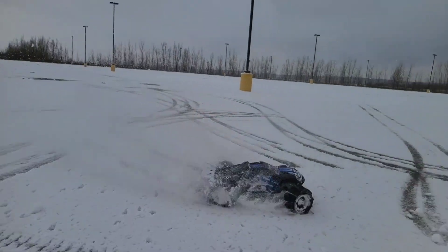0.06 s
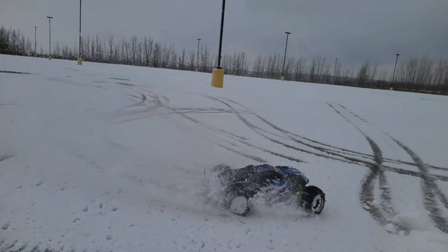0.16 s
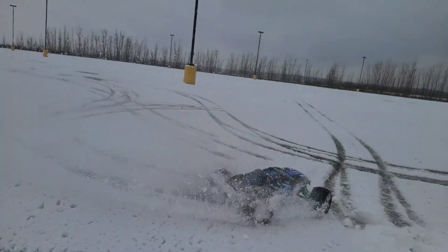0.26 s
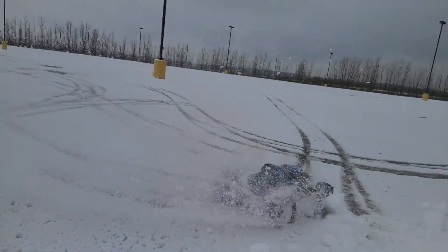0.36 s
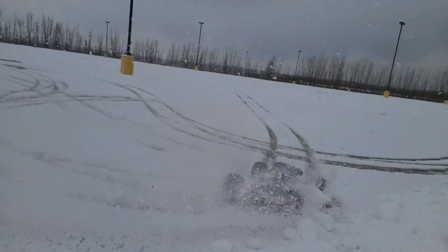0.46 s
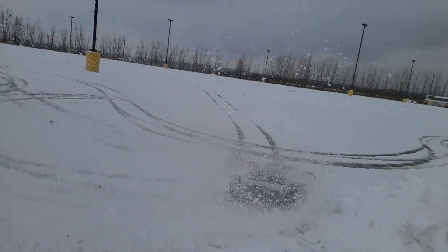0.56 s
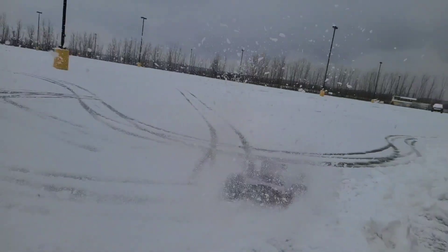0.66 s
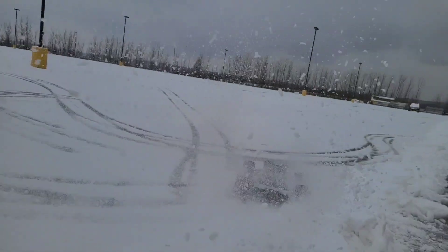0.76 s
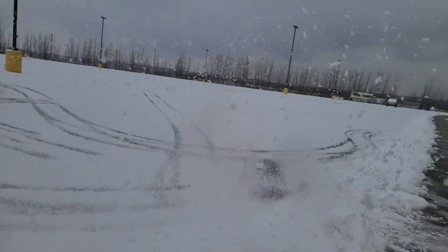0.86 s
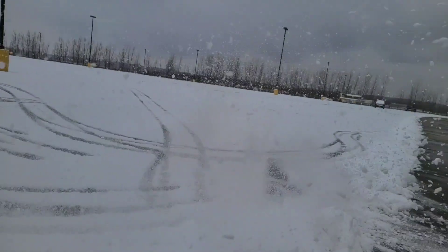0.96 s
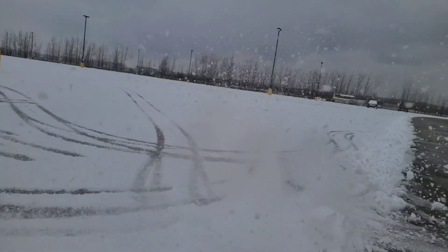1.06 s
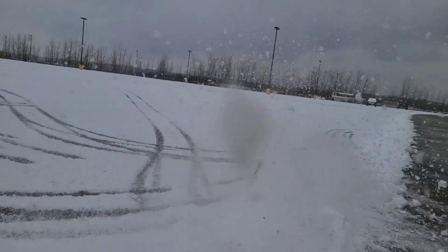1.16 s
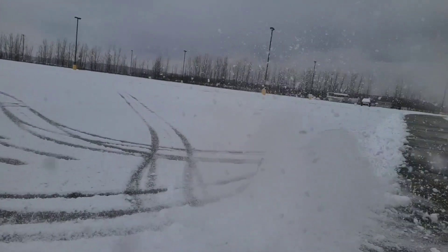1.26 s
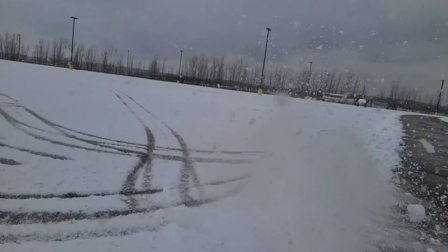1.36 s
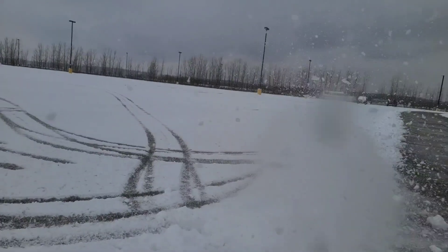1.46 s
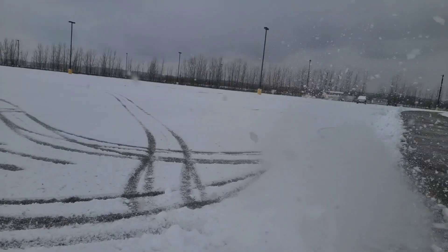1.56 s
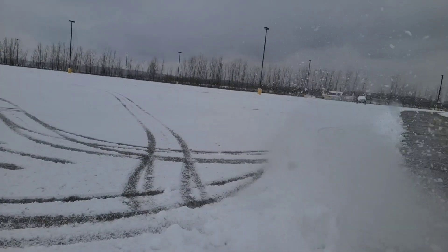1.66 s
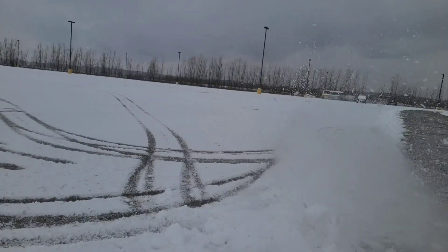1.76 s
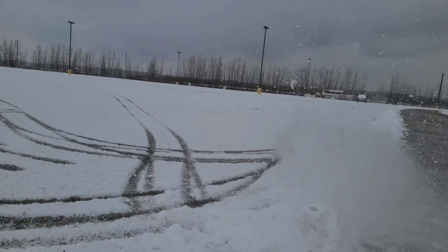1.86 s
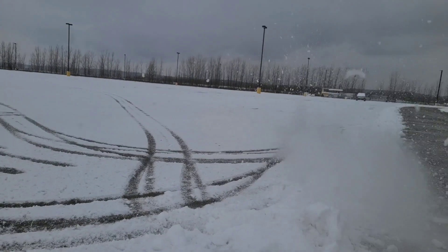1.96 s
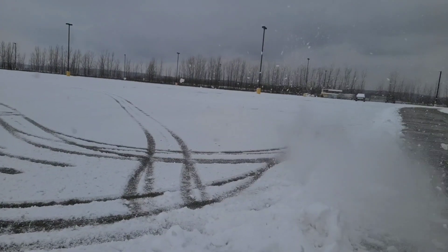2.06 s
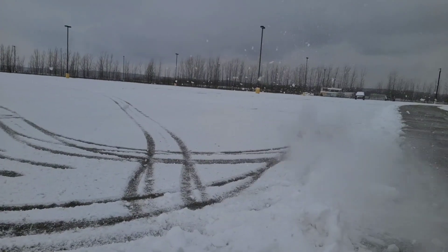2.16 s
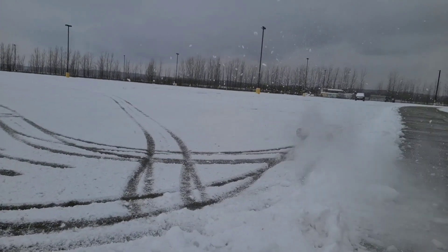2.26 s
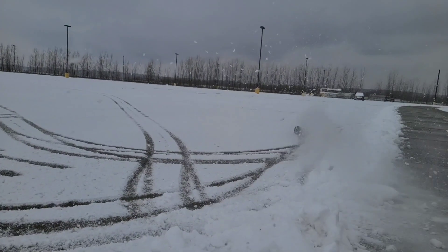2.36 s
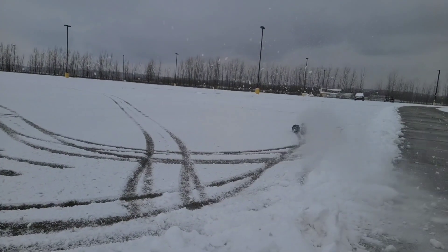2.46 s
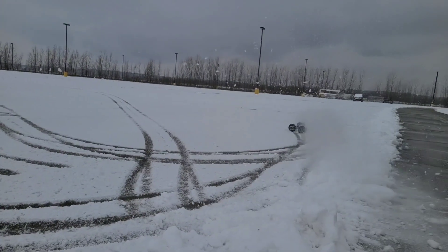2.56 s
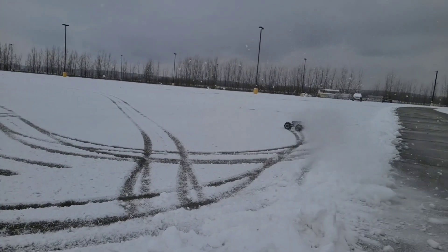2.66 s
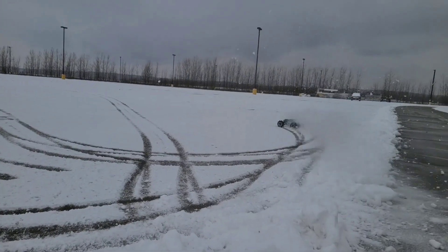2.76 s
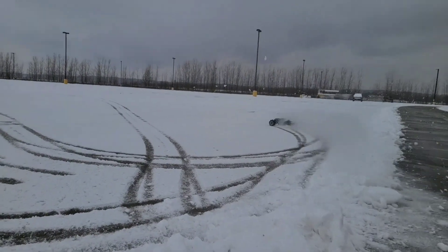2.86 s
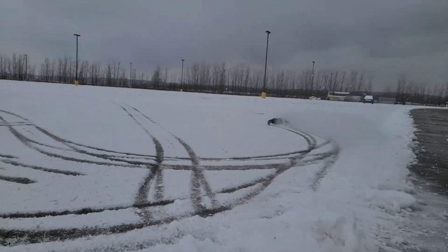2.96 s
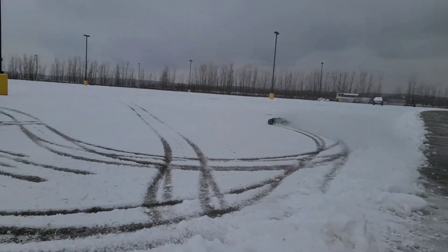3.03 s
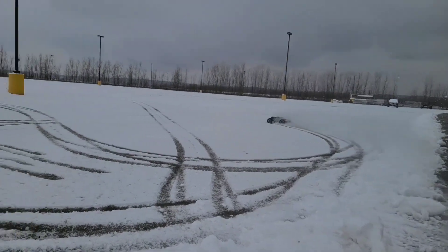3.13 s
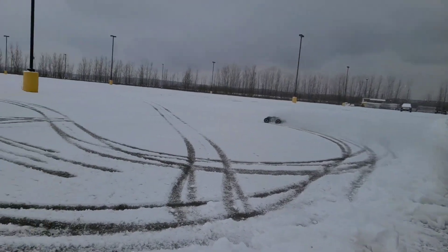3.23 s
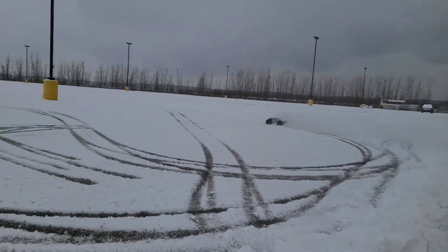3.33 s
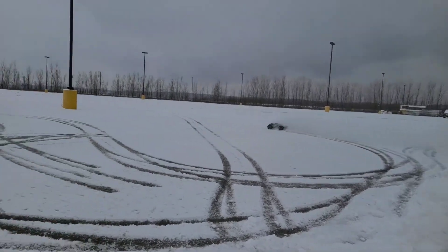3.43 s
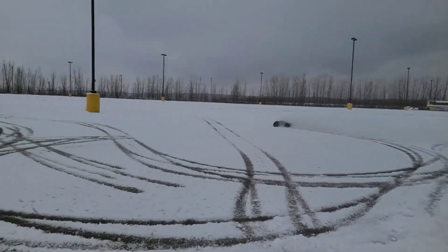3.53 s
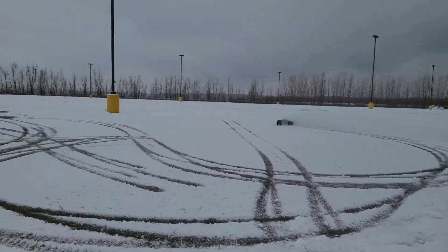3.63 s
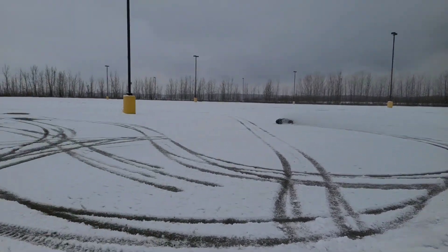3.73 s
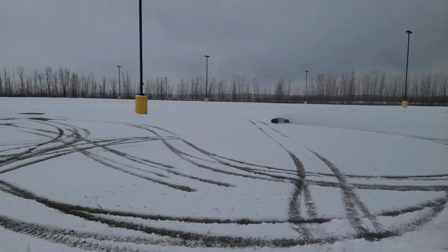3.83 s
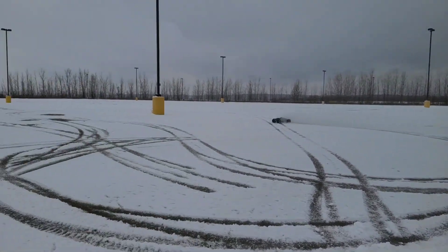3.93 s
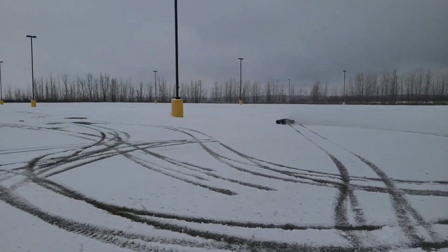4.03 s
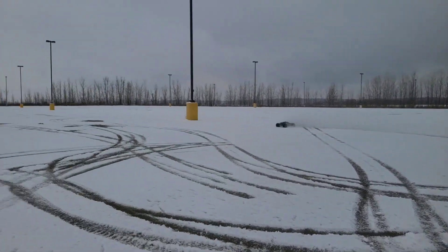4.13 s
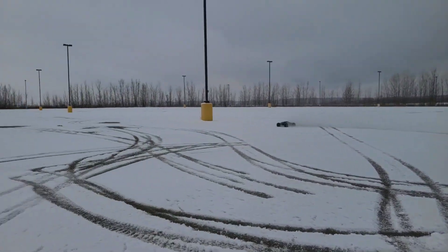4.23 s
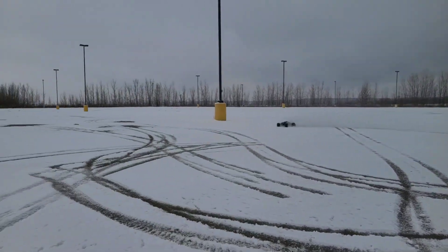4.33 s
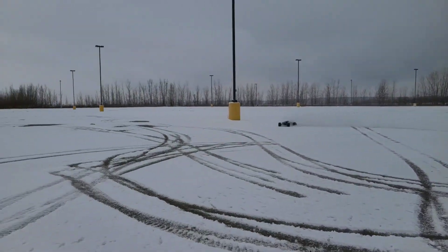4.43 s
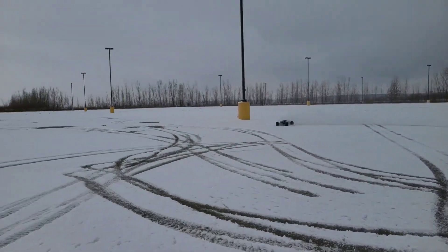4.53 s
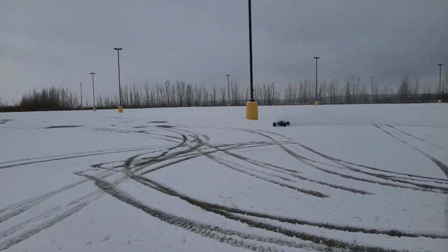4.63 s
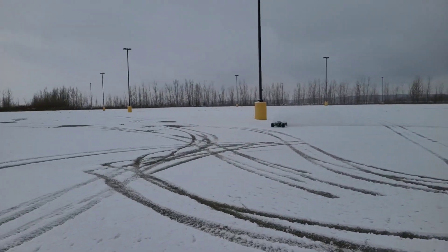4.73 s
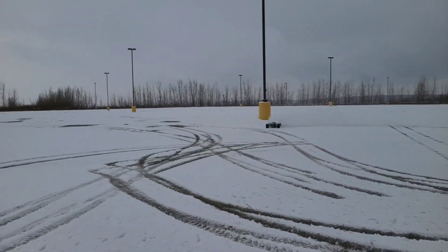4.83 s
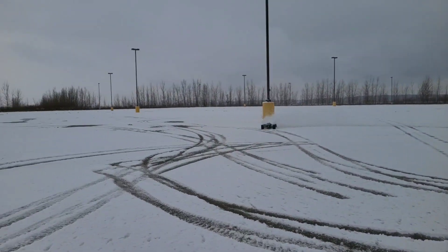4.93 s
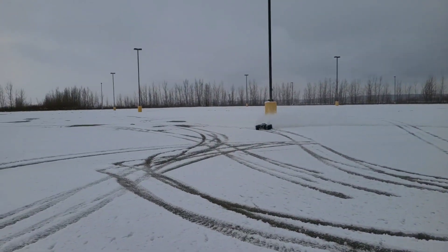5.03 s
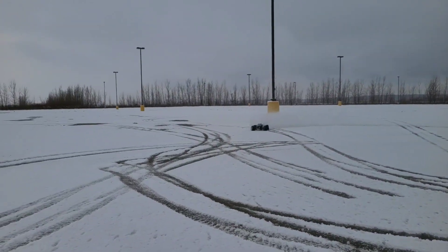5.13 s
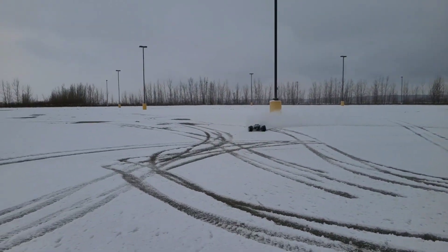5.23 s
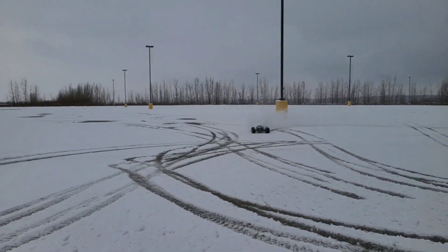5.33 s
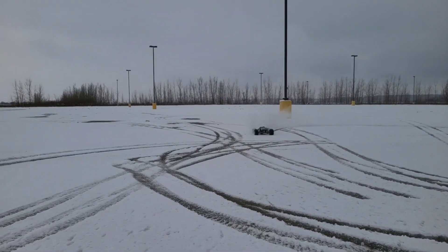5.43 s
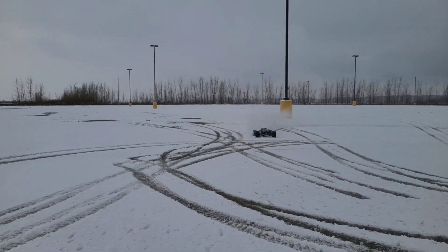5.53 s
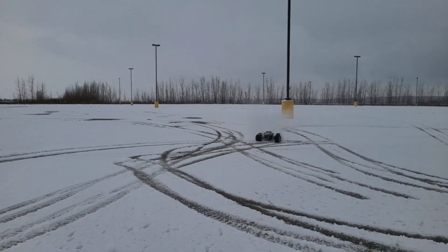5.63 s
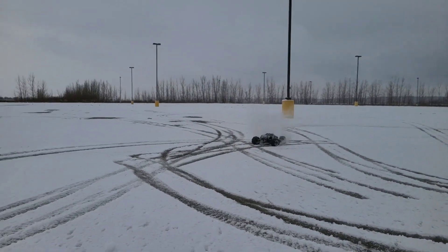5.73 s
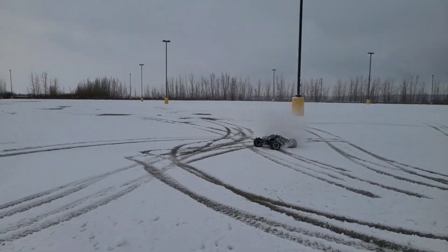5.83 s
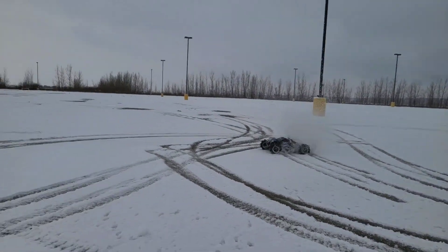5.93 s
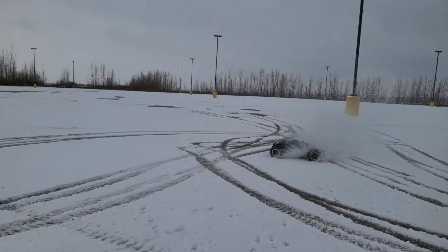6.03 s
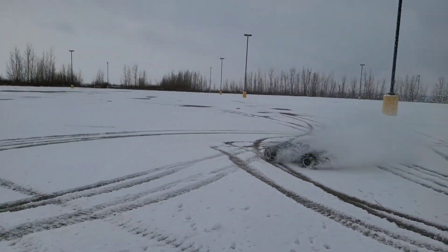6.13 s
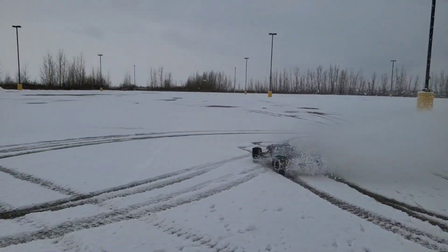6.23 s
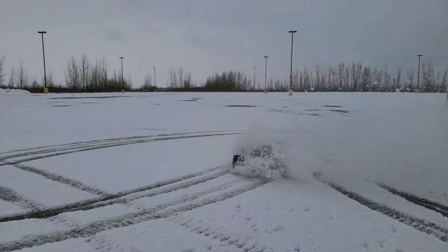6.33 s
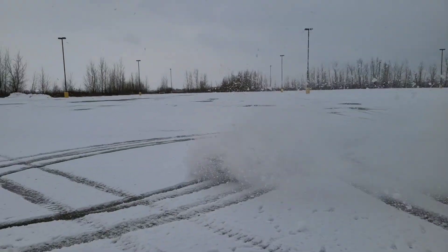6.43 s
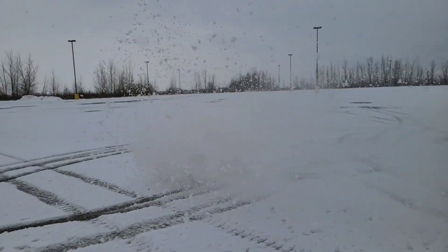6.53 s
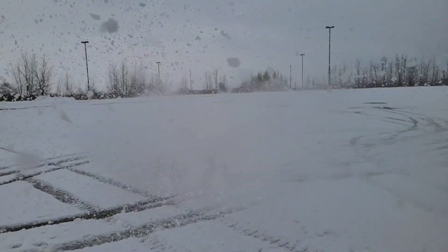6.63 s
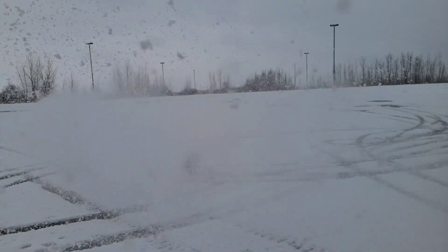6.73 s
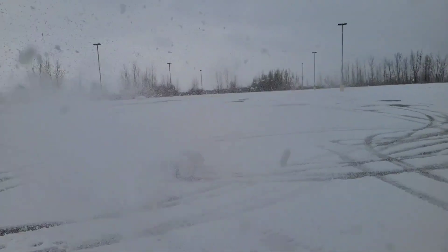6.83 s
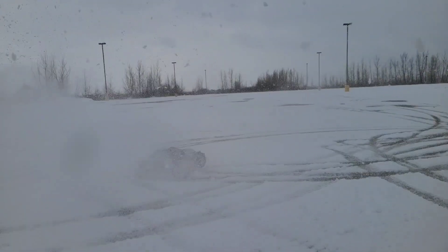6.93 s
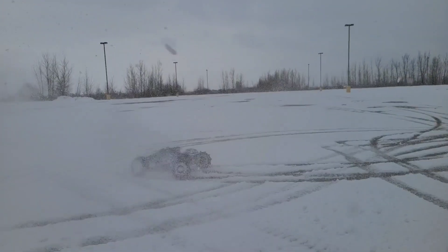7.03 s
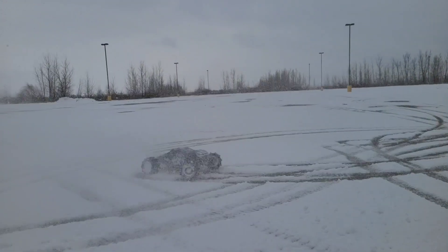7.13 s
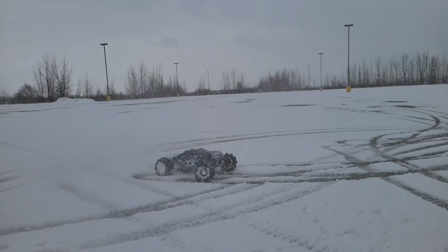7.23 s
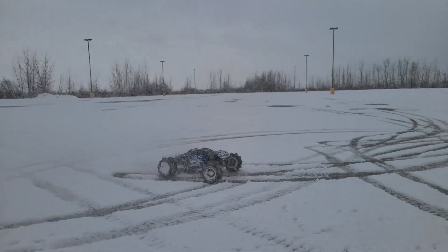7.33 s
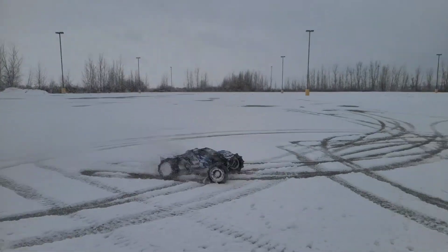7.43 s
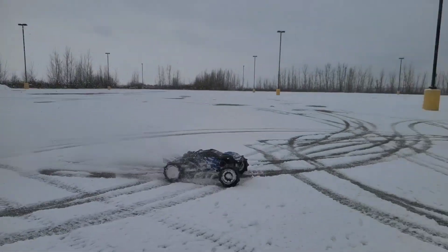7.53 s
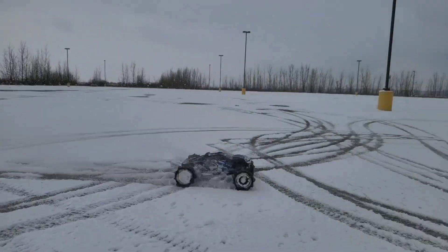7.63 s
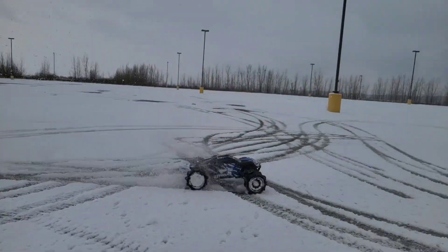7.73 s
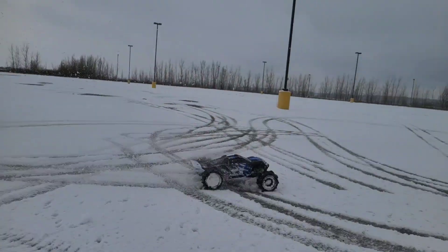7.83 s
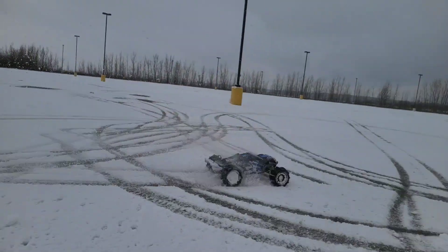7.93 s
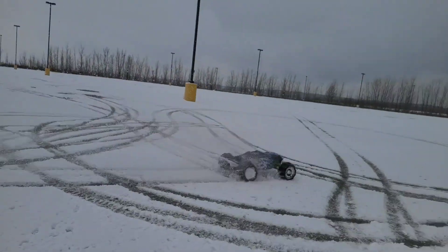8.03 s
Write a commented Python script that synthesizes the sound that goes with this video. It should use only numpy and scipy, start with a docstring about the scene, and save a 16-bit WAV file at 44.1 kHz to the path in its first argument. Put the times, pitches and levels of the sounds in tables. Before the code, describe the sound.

A small electric truck roars and whines through snow, dropping into octave-low slow motion while snow pelts the microphone, then returns at full speed.

```python
"""A small electric truck spins its tyres in snow: lumpy noise roars, shaft orders whine over hiss and a far hum.
At once playback drops to half speed for three seconds: roar, whine and hum sink an octave and the top is cut.
Within it the truck hops, its free low gear sings clean, and thrown snow ticks on the hand-held camera as noise bursts.
The truck drives off; at full speed boots crunch as gritty swells, and it comes back past, pelting the camera again.
Noise is shaped by spectra and random gains, tones by summed phase; the paths to two ports and echoes shape both."""
import sys
import numpy as np
from scipy import signal
from scipy.fft import rfft, irfft, next_fast_len
from scipy.io import wavfile
from scipy.ndimage import uniform_filter1d, map_coordinates

SR = 44100
rng = np.random.default_rng(int(sys.argv[2]) if len(sys.argv) > 2 else 0)


def attenuation_scalar(level_db):
    """Turn a level in dB into a linear amplitude multiplier (20 dB per decade)."""
    decades = np.asarray(level_db, float) / 20
    return 10 ** decades


def file_out(sig):
    """Save sig as 16-bit WAV at sys.argv[1]."""
    # one column per channel
    cols = np.atleast_2d(sig).T
    # limit, then scale
    lim = np.clip(cols, -1, 1)
    pcm = np.round(lim * 32767).astype(np.int16)
    wavfile.write(sys.argv[1], SR, pcm)


N = 356769

# motion and load of the truck: (time [s], nearness [dB], tyres digging in [dB],
# nominal loudest gear tone at full speed [Hz], motor load [dB])
DRIVE = [(0.0, 1, -0.5, 5610, 2), (0.1, -1, -1.5, 5640, 2), (0.36, -0.5, -1.5, 5580, 2),
         (0.64, -1.5, -4, 5460, -6), (1.0, -2.5, -5, 5700, -5.5), (1.25, -3.5, -12.5, 5465, -1.5),
         (1.6, -3.5, -13.5, 5640, -7.5), (2.0, -6.5, -17.5, 5520, -1.5), (2.5, -10, -19, 5500, -2),
         (2.85, -12.5, -19, 5650, -1.5), (3.08, -12, -15.5, 5600, -3), (3.3, -12.5, -18.5, 5440, -5.5),
         (3.8, -12.5, -20.5, 5640, -4.5), (4.2, -11.5, -19.5, 5470, -3), (4.7, -9.5, -16.5, 5550, 1),
         (5.3, -8, -15.5, 5690, -3.5), (5.7, -7, -13, 5650, 3.5), (6.0, -5, -9.5, 5800, 3.5),
         (6.35, -3, -6.5, 5485, 1), (6.55, -1.5, -1, 5520, -1), (6.85, -3, 3.3, 5520, 0),
         (7.0, 2, 4, 5720, 1), (7.2, -3, -0.5, 5560, 6.5), (7.38, 1, -0.5, 5730, -3.5),
         (7.52, -4, -4, 5820, -1), (7.73, 1.5, -3, 5750, 2.5), (7.95, 2.2, -4.5, 5550, 1.5),
         (8.09, 2.5, -5, 5480, 2.5)]
# the hop, tyres off the snow: (start [s], end [s], edge [s])
TYRES_OFF = (.79, .93, .05)


def unit(x):
    """Normalization of signal power: scaled to rms 1."""
    return x / np.sqrt(np.mean(np.abs(x) ** 2) + 1e-20)


def along(points, hz):
    """Logarithmic frequency scale: (frequency [Hz], value) points joined by lines on it."""
    f, v = np.transpose(points)
    return np.interp(np.log(hz + 1), np.log(f + 1), v)


def curves(rows):
    """Linear interpolation in time: one value per sample for each column after the time."""
    s, *columns = np.transpose(rows)
    return [np.interp(np.arange(N) / SR, s, column) for column in columns]


def wobble(rate):
    """Band-limited random modulation: a smooth curve through rate random knots a second."""
    knots = rng.standard_normal(int(N * rate / SR) + 4)
    return map_coordinates(knots, [np.arange(N) * rate / SR])


def filtered(x, response):
    """Linear filtering: the spectrum of x times a complex response of frequency."""
    m = next_fast_len(N + 8192)
    return irfft(rfft(x, m) * response(np.fft.rfftfreq(m, 1 / SR)), m)[..., :N]


def slowed():
    """Time scaling: 1 while playback runs at half speed, 0 elsewhere, with short ramps."""
    start_s, end_s, ramp_s = 0.0655, 3.092, 0.0043
    t = np.arange(N) / SR
    return np.clip(np.minimum(t - start_s, end_s - t) / ramp_s + .5, 0, 1)


def played(make):
    """Frequency scaling with speed: crossfades make(0.498) in the slow stretch with make(1) outside."""
    return slowed() * make(0.498) + (1 - slowed()) * make(1)


def scaled(spectrum):
    """Frequency scaling: every frequency of the spectrum is multiplied by the playback speed."""
    return lambda speed: [(hz * speed, db) for hz, db in spectrum]


def rush(spectrum, patchy_db):
    """Coloured noise: two unrelated noises of rms 1 share time-frequency patches of random gain."""
    z = signal.stft(rng.standard_normal((2, N)), nperseg=512)[2]
    field = uniform_filter1d(rng.standard_normal(z.shape[1:]), 5, 0)
    field = uniform_filter1d(field, 6, 1)
    pair = signal.istft(z * attenuation_scalar(patchy_db * unit(field)), nperseg=512)[1][:, :N]

    def coloured(speed):
        points = [(10, -120)] + spectrum(speed) + [(SR / 2, -120)]
        return unit(filtered(pair, lambda hz: attenuation_scalar(along(points, hz))))

    return played(coloured)


def swells(rows):
    """Gaussian level modulation: rises or dips in dB from (time [s], peak [dB], half length [s]) rows."""
    t = np.arange(N) / SR
    return sum(db * np.exp(-((t - s) / half) ** 2) for s, db, half in rows)


def lull(span):
    """Gating by a trapezoid: 1 inside the (start, end, edge) span in seconds, else 0."""
    start, end, edge = span
    t = np.arange(N) / SR
    return np.clip(np.minimum(t - start, end - t) / edge + .5, 0, 1)


def level(law):
    """Source strength as a linear law: a layer's dB from nearness, digging, load and playback speed."""
    # the tyres bite suddenly: (time [s], extra digging [dB], half length [s])
    bites = [(0.72, 11, 0.036), (0.974, 10, .03)]
    near_db, dig_db, _, load_db = curves(DRIVE)
    dig_db = dig_db + swells(bites)
    base_db, per_near, per_dig, per_load, slow_db = law
    return base_db + per_near * near_db + per_dig * dig_db + per_load * load_db + slow_db * slowed()


def whine(lines, db, turn, width_hz, throb_db, drift_db):
    """Narrow-band modulation: (phase, dB, place in turn) lines are smeared by slow noise and throb each turn."""
    draw = rng.standard_normal((2, 2, N))
    # width_hz holds at full speed and narrows with it
    smear = played(lambda speed: unit(filtered(draw, lambda hz: 1 / (1 + (hz / (width_hz * speed)) ** 2))))
    tone = np.zeros((2, N))
    for phase, line_db, shift in lines:
        swell = attenuation_scalar(line_db + throb_db * np.cos(turn + shift) + drift_db * wobble(6))
        tone += swell * (smear[0] * np.cos(phase) + smear[1] * np.sin(phase))
    return attenuation_scalar(db) * tone


def roar():
    """Impact and structure-borne noise: lugged tyres beat the snow in lumps and shake the chassis."""
    # spectra at full speed, chassis and its octave, tyre lugs, churned snow and its top:
    # (frequency [Hz], relative level [dB])
    thrum_spectrum, octave_spectrum = [(40, -39), (100, -19), (160, -6), (205, 2), (250, -5), (320, -20.5)], [(280, -16), (340, -6), (400, -2.5), (460, -6.5),
                                                      (540, -29.5)]
    growl_spectrum = [(250, -10), (300, -4.5), (480, -2.5), (560, 1), (660, -3), (760, -13), (1000, -26)]
    churn_spectrum, churn_top_spectrum = [(560, -40), (750, -3.5), (1000, -2.5), (1250, -2.5), (1500, -9),
                                          (1900, -15)], [(1150, -16), (1450, -1), (1850, 2.5), (2250, -3),
                                                         (2580, -4.5), (3000, -6), (3420, -7),
                                                         (4250, -12.5), (6400, -15), (9100, -28.5)]
    # how these layers follow the drive: (base level [dB], per nearness [dB/dB], per digging [dB/dB],
    # per load [dB/dB], shift at half speed [dB])
    thrum_law, octave_law = (-24.5, 0.84, 0.05, -0.05, 4.5), (-24.5, 1.14, 0.0557, -0.17, 1.5)
    growl_law = (-25.5, 0.05, 0.8, 0, -3)
    churn_law, churn_top_law = (-32, 0.16, 0.92, -0.06, 1), (-35.5, 0.16, 1.05, -0.03, 1.5)
    # the hop, chassis quiet: (start [s], end [s], edge [s])
    chassis_off = (.828, .9, .02)
    # churn alone swells or dips near 1 kHz: (time [s], change [dB], half length [s])
    churn_swells = [(.3, -3, .25), (3.2, 4, .2), (6.3, 1.5, .2), (7.4, -2.5, .08)]
    # churn and its top swell broadly: (time [s], rise [dB], half length [s])
    body_swells = [(1.3, 3, .3), (2.1, 5, .7), (4.2, 2.5, .5), (5.5, 1.5, .5), (6.7, 1.5, .2)]
    # the chassis thumps over ruts: (time [s], rise [dB], half length [s])
    jolts = [(1.7, 4, .04), (2.31, 4, .04), (2.93, 4, .03), (3.035, 7, .035), (7.02, 3, .05)]
    tyres_off, lumps = lull(TYRES_OFF), wobble(22)

    thrum_db = level(thrum_law) + 1.33 * lumps
    octave_db = level(octave_law) + 1.54 * lumps + 0.83 * wobble(30)
    chassis = attenuation_scalar(thrum_db) * rush(scaled(thrum_spectrum), patchy_db=-1.05)
    chassis += attenuation_scalar(octave_db) * rush(scaled(octave_spectrum), patchy_db=0.53)
    chassis *= attenuation_scalar(-18 * lull(chassis_off) + swells(jolts))

    growl_db = level(growl_law) - 17 * tyres_off + 1.1 * lumps + 1.05 * wobble(40)
    growl = attenuation_scalar(growl_db) * rush(scaled(growl_spectrum), patchy_db=0.05)

    churn_db = level(churn_law) - 17 * tyres_off + swells(churn_swells) + swells(body_swells)
    churn_db += 0.48 * lumps + 1.1 * wobble(60) + 1.6 * wobble(250)
    churn = attenuation_scalar(churn_db) * rush(scaled(churn_spectrum), patchy_db=1.6)

    top_db = level(churn_top_law) + swells(body_swells) - 10 * tyres_off
    top_db += 1.74 * wobble(60) + 2.3 * wobble(400)
    churn_top = attenuation_scalar(top_db) * rush(scaled(churn_top_spectrum), patchy_db=1.6)
    return chassis + growl + churn + churn_top


def gears():
    """Gear-mesh orders: tones at multiples of the shaft rate take turns each gear turn, over spray hiss."""
    # the gearbox: (time [s], nominal shaft rate at full speed [turns/s], nominal pitch swing [share],
    # middle gear level change [dB], low gear level change [dB])
    mesh = [(0, 444, .075, 2.5, 3), (.4, 442, .075, 2.5, 3), (.7, 440, .02, -1, -3),
            (1.2, 446, .03, -1, 1.5), (1.8, 444, .035, -4, 1.5), (2.3, 441, .05, -6, 1.5),
            (3.08, 441, .05, -8, -1.5), (3.4, 440, .006, -4, -4), (3.9, 442, .005, -5, -4),
            (4.3, 448, .004, -3, -3), (4.75, 448, .005, -2, -2), (5.0, 450, .004, 2, -2),
            (5.4, 450, .005, 2, -2), (5.6, 465, .006, -1, -2), (5.8, 470, .008, 1, 0),
            (6.0, 480, .006, 1, 1), (6.3, 464, .005, 1, 0), (6.7, 446, .005, 3, 0), (7.1, 452, .005, -1, 0),
            (7.6, 456, .004, 1, 0), (7.85, 432, .004, -.5, 0), (8.09, 428, .005, -2, 0)]
    # how these layers follow the drive: (base level [dB], per nearness [dB/dB], per digging [dB/dB],
    # per load [dB/dB], shift at half speed [dB])
    top_law, double_law = (-42.5, .7, 0.05, 0.98, 1.2), (-52.5, 0.7, 0.2, 0, -1.5)
    low_law, middle_law = (-43.5, 0.2, .5, .5, 5), (-46.5, 0.15, 0.5, 0.24, 1)
    spray_law = (-38.5, 0.83, 0.19, 0, 2.2)
    # sprayed snow at full speed, then as heard at half speed: (frequency [Hz], relative level [dB])
    spray_spectrum, spray_slow_spectrum = [(1500, -28), (2600, -21), (3600, -8), (4400, -3), (5600, -3),
                                           (7000, -5.5), (8200, -11), (9800, -8.5), (11600, -4),
                                           (13500, -6.5), (16000, -8)], [(450, -4), (900, 2.5), (1300, -4), (1760, -1.5),
                                                          (2300, -.5), (3000, -4), (3210, -5.5),
                                                          (3700, -5.5), (4200, -10), (5170, -8.5),
                                                          (7050, -6), (9280, -4), (11000, -10),
                                                          (11800, -19), (15300, -52), (22000, -120)]
    low_ratio, middle_ratio = 4.3, 8.15  # tooth rates of the other gears over the shaft rate
    free_rev, free_edge_s = .07, .09  # unloaded wheels speed up by this share, then settle

    shaft_hz, swing, middle_db, low_db = curves(mesh)
    free = lull((TYRES_OFF[0], TYRES_OFF[1] + free_edge_s, free_edge_s))
    speed = 1 - slowed() / 2
    # the order that sounds loudest
    lead = curves(DRIVE)[2] / shaft_hz + .4 * free + .35 * wobble(11) * (1 - free)
    turn = 2 * np.pi * np.cumsum(speed * (36.5 + 4 * wobble(7))) / SR
    bend = swing * attenuation_scalar(2.2 * wobble(4.5)) * np.sin(turn)  # once a gear turn
    bend += .3 * swing * wobble(45) + .005 * wobble(6)
    warble = 1 + bend * (1 - free)
    shaft = 2 * np.pi * np.cumsum(shaft_hz * speed * (1 + free_rev * free) * warble) / SR

    # at half speed, outside the hop, a swooping pair stands over the shaft orders;
    # its upper tone follows the middle gear
    swooping = slowed() * (1 - free)
    top = [(k * shaft, -6 * swooping - 7.5 * np.abs(k - lead) ** 1.3, 2.4 * k) for k in (11, 12, 13, 14)]
    top_throb_db = (4.5 + 1.5 * wobble(8)) * (1 - free)
    tones = whine(top, level(top_law) + .6, turn, width_hz=80, throb_db=top_throb_db, drift_db=1.6)
    swoop = [(12.6 * shaft, -1.2, .4), (16.4 * shaft, -6 + middle_db, 1.6)]
    tones += swooping * whine(swoop, level(top_law), turn, width_hz=95, throb_db=2.5, drift_db=1.5)

    double = [(k * shaft, -1.5 * np.abs(k - 2 * lead - 1), 2.4 * k) for k in (25, 26, 27, 28)]
    tones += whine(double, level(double_law) - .6, turn, width_hz=300, throb_db=3.5, drift_db=4)
    low = [(low_ratio * shaft, -3 * free, 2.2), ((low_ratio - .55) * shaft, -3 - 8 * free, .6)]
    tones += whine(low, level(low_law) + low_db, turn, width_hz=80, throb_db=4.5, drift_db=3)
    middle = [(middle_ratio * shaft, 0, 2.7), ((middle_ratio - .6) * shaft, -5, .7)]
    middle_db = level(middle_law) + middle_db - 2.5 - 6 * free
    tones += whine(middle, middle_db, turn, width_hz=110, throb_db=5, drift_db=3)

    spray = rush(lambda rate: spray_spectrum if rate == 1 else spray_slow_spectrum, patchy_db=1.7)
    spray_db = level(spray_law) - 1.5 * lull(TYRES_OFF) + 1.27 * wobble(30) + 1.0 * np.cos(turn)
    return tones + attenuation_scalar(spray_db) * spray


def far_hum():
    """Low-frequency band noise: a far hum whose level wavers slowly."""
    # hum at full speed: (frequency [Hz], relative level [dB])
    rumble = [(20, -27), (40, -18), (50, -4), (56, 1.5), (63, -5), (75, -12), (120, -5.5), (200, -45)]
    hum_db = -40.0 - 1.5 * slowed() + 2.1 * wobble(2.96)
    return attenuation_scalar(hum_db) * rush(scaled(rumble), patchy_db=1.5)


def ports(pair):
    """Interaural-style coherence and delay: unrelated signals are mixed to a likeness; the right port lags."""
    # likeness of the two ports: (frequency [Hz], correlation [-1 to 1])
    alike = [(40, 0.93), (90, 1), (240, 0.96), (950, 0.8), (2500, 0.6), (5500, .45), (8000, 0.2),
             (15000, 0.18)]
    # phase by which the left port leads: (frequency at full speed [Hz], lead [radians])
    lead = [(0, -0.5), (400, 0.09), (1050, 0.5), (1500, 2.5), (2700, 5.5), (16000, 30.5)]

    def mixing(hz):
        angle = np.arccos(np.clip(along(alike, hz), -1, 1)) / 2
        return np.array([np.cos(angle), np.sin(angle)])

    mid, side = filtered(pair, mixing)

    def lagging(speed):
        return filtered(mid - side, lambda hz: np.exp(-1j * np.interp(hz / speed, *np.transpose(lead))))

    return np.array([attenuation_scalar(1.9) * (mid + side), attenuation_scalar(2.5) * played(lagging)])


def echoes(pair):
    """Comb filtering: treble returns off the holder's hands and coat; swaying paths make the notches drift."""
    # short echoes at full speed: (mean delay [ms], mean level [dB], sway [ms])
    paths = [(2.0, -8, .07), (2.8, -11, .06)]
    treble_hz, slow_db = 900, -4
    treble = filtered(pair, lambda hz: hz ** 2 / (hz ** 2 + treble_hz ** 2))
    out, power = treble.copy(), np.ones((2, N))
    for delay_ms, db, sway_ms in paths:
        for port in range(2):
            # in samples; half speed doubles the delay
            late = (delay_ms + sway_ms * wobble(1.6)) * (1 + slowed()) * SR / 10 ** 3
            gain = attenuation_scalar(db + slow_db * slowed() + 3 * wobble(2.2))
            out[port] += gain * map_coordinates(treble[port], [np.arange(N) - late], order=2)
            power[port] += gain ** 2
    return pair - treble + out / np.sqrt(power)


def held():
    """Frequency modulation: the free low gear sings a clear tone that rises, sags and reaches both ports at once."""
    span = (.825, 1.0, .03)  # start, end, edge (s)
    centre_hz, swing_hz = 1000, 35
    t, middle = np.arange(N) / SR, (span[0] + span[1]) / 2
    hz = centre_hz + swing_hz * np.cos(np.clip((t - middle) / .04, -np.pi, np.pi))
    tone = attenuation_scalar(-36 + 2.5 * wobble(45)) * lull(span) * np.sin(2 * np.pi * np.cumsum(hz) / SR)
    return tone * attenuation_scalar([[1.5], [-1.5]])


def pellets():
    """Impulsive excitation: snow shatters in milliseconds as crack and thud; small pellets rain and thin out."""
    # thrown snow striking the camera, before colouring: (time [s], crack level [dB],
    # thud over crack [dB], decay length [ms], left over right [dB])
    strikes = [(1.0465, -29, -5, 1.6, .1), (1.0735, -22, -3, 4.2, -3), (1.1084, -16, -1, 1.6, -1.5),
               (1.1214, -18, -4, 4, 0), (1.156, -24, -2, 1.6, -1.5), (1.1704, -15, -18, 2.1, -16),
               (1.1784, -13.5, -19, 1.6, 10.5), (1.2056, -27, -5, 1.6, .1), (1.2478, -13.5, -10, 1.6, -14),
               (1.251, -10, -17, 1.6, -6), (1.263, -18, -2.5, 1.6, 8), (1.2995, -24, 0, 1.8, -2.5),
               (1.37, -19.5, 0, 1.5, -14), (1.3834, -19, -9, 1.6, -5.5), (1.456, -18.5, -12, 1.7, -6),
               (1.4798, -11.5, -17, 1.2, -20), (1.5155, -18.5, -4, 4.1, 3), (1.5394, -26, -5, 1.6, .1),
               (1.6112, -27, -9, 1.8, -16), (1.6661, -27, -5, 1.6, .1), (1.905, -26, -8.5, 4.1, -12),
               (1.9744, -22, -5, 4, -7), (2.2554, -22, 1.5, 3.7, -14.5), (2.277, -29, -8, 3.9, -6.5),
               (2.602, -30, -8, 1.6, -12), (2.7956, -19.5, 5, 2.27, 17), (2.9033, -33, -5, 3, .1),
               (3.0194, -36, -3, 4, .1), (3.6351, -38, -15, 2.5, .1), (3.6894, -40, 7, 1.6, .1),
               (4.0951, -38, -12, 4, .1), (4.6129, -25, -3, 1.57, -2), (4.9487, -33, 1.5, 1.6, -1.5),
               (5.1694, -35, 2.5, 1.6, 1.5), (5.519, -19.5, 1, 3.8, -10.5), (5.5264, -27, 5, 3.9, -7),
               (6.9461, -27, -5, 1.6, .1), (6.9765, -26, -3, 1.6, .1), (7.0005, -26, -5, 1.6, .1),
               (7.0539, -16.5, -5, 1.62, 6), (7.0783, -17, -6, 1.6, .1), (7.0864, -17, -4, 4, 4),
               (7.1402, -13.5, -2, 1.6, -4), (7.2794, -23, .1, 1.6, .1), (7.9209, -24, 1.5, 2.5, .1)]
    # colour of the crack: (frequency [Hz], gain [dB])
    sharp = [(1200, -21), (4000, -15.5), (5500, 3.5), (11000, 1.5), (16000, -6)]
    # colour of the thud: (frequency [Hz], relative gain [dB])
    dull = [(600, -24), (2000, -10), (3300, 0), (4500, -3.5), (7000, -21)]
    t, shapes = np.arange(600) / SR, np.zeros((2, 2, N + SR))
    small = []
    for when, size, dullness, side in rng.random((50, 4)):
        start_s, crack_db = .95 + 2.3 * when ** 1.8, -41 + 8 * size - 6 * when
        small.append((start_s, crack_db, -2 + 8 * dullness, 1.5, 14 * (side - .65)))
    for s, db, thud_db, length_ms, pan_db in list(strikes) + small:
        length_s = max(length_ms, .5) / 10 ** 3
        shape = (1 - np.exp(-t / 0.0002)) * np.exp(-(t / length_s) ** 1.8)
        # rows: crack, thud; columns: left, right
        gains = attenuation_scalar(db + np.array([[0], [thud_db]]) + np.array([pan_db / 2, -pan_db / 2]))
        first = round(s * SR)
        shapes[:, :, first:first + len(t)] += gains[:, :, None] * shape
    crack, thud = shapes[:, :, :N] * rng.standard_normal((2, 2, N))
    crack = filtered(crack, lambda hz: attenuation_scalar(along(sharp, hz)))
    return crack + filtered(thud, lambda hz: attenuation_scalar(along(dull, hz) + 6.5))


def steps():
    """Granular friction: each boot packs snow, a short swell of gritty noise."""
    # boots on snow: (time [s], peak of the swell [dB])
    treads = [(3.798, -47), (4.076, -38.5), (4.4543, -42), (4.7805, -40), (5.025, -47.5), (5.51, -36),
              (5.731, -38)]
    # colour of packed snow: (frequency [Hz], relative level [dB])
    crunch = [(520, -24), (860, 5.5), (1320, -9), (2120, 1), (3050, -12.5), (3850, -21), (11800, -26)]
    half_s = 0.038 / 2
    t = np.arange(N) / SR
    swell = sum(attenuation_scalar(db) * np.exp(-((t - s - half_s) / half_s) ** 2) for s, db in treads)
    return swell * attenuation_scalar(2.9 * wobble(300)) * rush(scaled(crunch), patchy_db=-4.0)


def scene():
    """Superposition: truck, hum and steps reach both ports with echoes; tone and pellets bypass these paths."""
    airborne = roar() + gears() + far_hum() + steps()
    return echoes(ports(airborne)) + held() + pellets()


def top_cut(x):
    """Nothing passes above the cut-off."""
    return signal.sosfilt(signal.butter(12, 17010, fs=SR, output="sos"), x)


def record(dry):
    """Band limiting and saturation: half speed lowers the top frequency; loud peaks clip softly."""
    top_hz, slow_top_hz, slow_edge_hz = 15800, 11500, 700

    def band(speed):
        if speed == 1:
            return filtered(dry, lambda hz: hz < top_hz)
        return filtered(dry, lambda hz: np.clip((slow_top_hz - hz) / slow_edge_hz + .5, 0, 1) ** 2)

    limited = played(band)
    clipped = limited / (1 + np.abs(limited / 1.1) ** 6) ** (1 / 6)
    return top_cut(clipped)


dry = scene()
out = record(dry)
file_out(out)
```